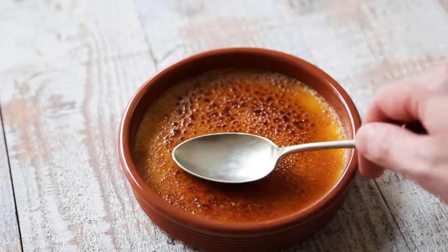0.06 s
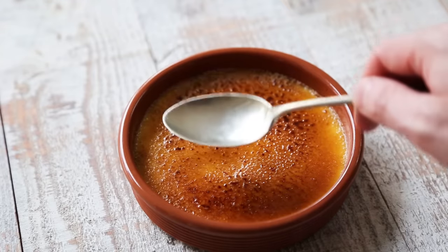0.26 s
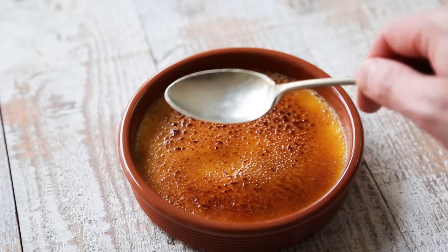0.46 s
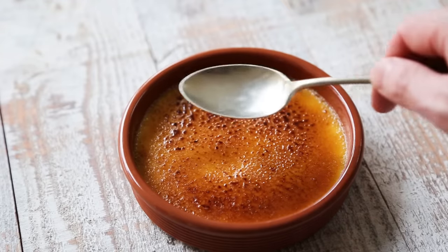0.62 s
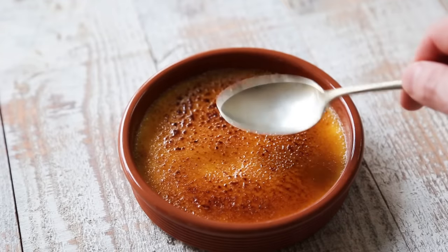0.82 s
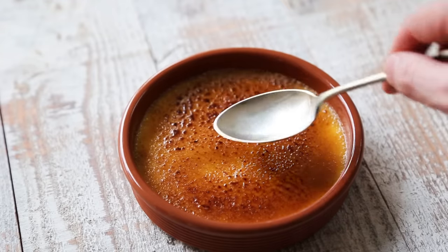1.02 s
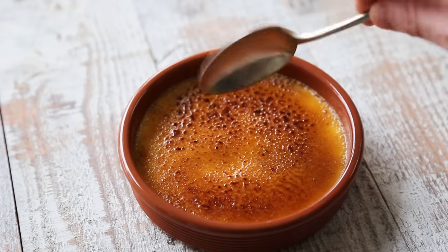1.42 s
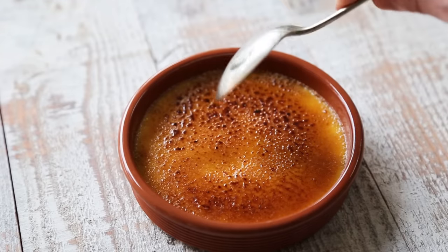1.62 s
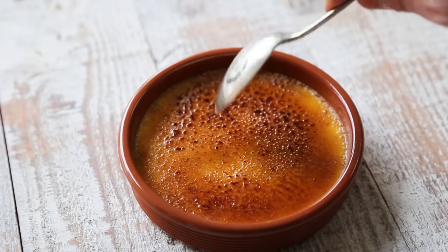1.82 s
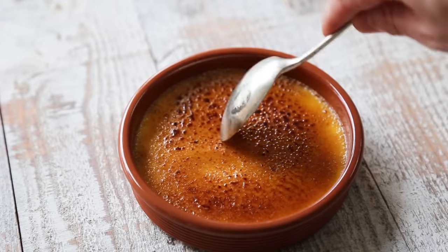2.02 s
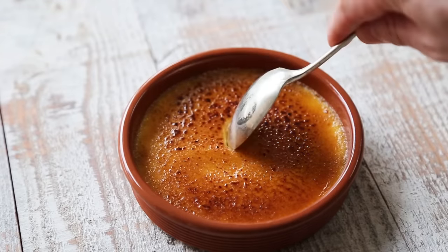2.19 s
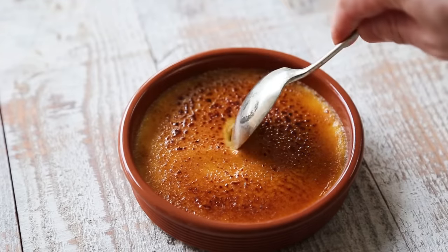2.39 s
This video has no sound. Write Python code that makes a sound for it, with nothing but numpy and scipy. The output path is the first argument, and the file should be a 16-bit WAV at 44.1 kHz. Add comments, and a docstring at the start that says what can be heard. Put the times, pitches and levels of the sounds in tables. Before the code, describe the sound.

A metal spoon taps a hard caramel crust once, sharply, and the dish thuds softly. After a pause, a lighter tap leads into crackling, a hollow snap and fine splintering, heard close in a small, quiet kitchen.

```python
"""Cracking a caramel crust

A steel spoon taps the crust and the dish thuds softly on the table. Later the tip is set down and
pressed: the sugar crackles, snaps with a hollow crack and keeps splintering. A small kitchen hums
and answers, two faint far chirps pass, and a limiter ducks after the loud tap."""
import sys
import numpy as np
from scipy import signal
from scipy.fft import rfft, irfft, next_fast_len
from scipy.io import wavfile
from scipy.ndimage import uniform_filter1d, minimum_filter1d, map_coordinates

SR = 44100
rng = np.random.default_rng(int(sys.argv[2]) if len(sys.argv) > 2 else 0)


def pcm_store(signal):
    """Save signal as 16-bit PCM."""
    levels = np.round(np.clip(np.atleast_2d(signal), -1, 1) * 32767)
    wavfile.write(sys.argv[1], SR, levels.astype(np.int16).T)


N = 112454

# spoon hits on the crust: t/s, level/dB, contact cutoff/Hz
SPOON_TAPS = [(.1099, 9.5, 19000), (2.0684, -10.5, 8000)]
# the spoon, damped by the crust: f/Hz, level/dB, t60/s
SPOON_MODES = [(181, -32.5, 0.028), (1327, -18, 0.023), (2480, -20.5, 0.011), (3470, -19.5, 0.009),
               (5820, -4.5, 0.0033), (6800, -14.5, .008), (8190, -7, 0.01), (8750, -11, 0.014),
               (9500, -10, 0.0061), (11750, -18, 0.0031), (12980, -2, 0.0037), (14500, -10, 0.0027)]
# colour of crushed sugar: f/Hz, level/dB
GRIT_COLOUR = [(500, -11), (2000, -10), (3200, -1), (5500, -2.5), (10000, 7.5), (12000, 4.5), (15500, 2)]
# the dish on the table: f/Hz, level/dB, t60/s
DISH_MODES = [(154, -32, 0.13), (256, -15.5, 0.28), (306.8, -12.5, .28), (389, -2.5, .045),
              (498, -10.5, 0.046), (627, -10, 0.032)]
# the crust gives way: t/s, level/dB
CRUST_SNAPS = [(2.2451, -7), (2.2528, -18.5), (2.255, -23)]
# the sugar plate: f/Hz, level/dB, t60/s
CRUST_MODES = [(247, -32, .06), (406, -24.5, 0.036), (737, -22.5, 0.046), (1118, -9.5, 0.025),
               (1410, 1.5, 0.0082), (1706, 2.5, 0.0097), (2566, -6, 0.011), (3450, -17, 0.011),
               (4930, -15.5, 0.0081), (5950, -17.5, 0.0076), (8350, -16, 0.0072)]
# bursts of tiny fractures: t/s, level/dB, length/s, splinter share/dB
CRACKLE_BURSTS = [(2.145, -36.5, .012, 0), (2.157, -35, 0.0096, -4), (2.167, -32, 0.0045, -7),
                  (2.18, -31.5, 0.01, -1), (2.194, -29.5, 0.0083, 0), (2.206, -29, .013, 0),
                  (2.223, -36, .012, -2), (2.235, -34.5, 0.0088, -6), (2.302, -43.5, 0.0025, -1),
                  (2.343, -41, 0.0079, 4), (2.4342, -33.5, 0.0025, -2), (2.44, -39.5, .004, 0),
                  (2.467, -41, 0.013, -7), (2.4898, -44.5, 0.0037, 1), (2.5014, -39.5, .004, -4),
                  (2.5236, -29.5, 0.0068, 4.5)]
# the pressed spoon tip: f/Hz, level/dB, t60/s
TIP_MODES = [(1403, -6.5, 0.023), (2560, -7.5, 0.014), (3650, -3.5, 0.0081), (4470, -5.5, 0.0037),
             (5560, -1.5, 0.0095), (6290, -0.5, 0.0071), (7750, 2.5, 0.0046), (8370, -3.5, 0.016),
             (9080, 8, 0.0021)]
# thin sugar splinters: f/Hz, level/dB, t60/s
SPLINTER_MODES = [(12600, 0, 0.0034), (13900, -3, .006), (14500, -5, .004)]
# far whistles, the first two overlapping: t/s, length/s, start f/Hz, end f/Hz, level/dB
CHIRP_GLIDES = [(.55, 0.12, 2704, 2810, -64.5), (0.609, 0.122, 3000, 3113, -62),
                (.885, .13, 4160, 4185, -60.5)]
# bounces off near surfaces: delay/s, level/dB
REFLECTIONS = [(.0023, -19.5), (.0085, -15.5)]
# decay of the kitchen's tail: f/Hz, t60/s
ROOM_DECAY = [(150, 0.57), (400, 0.23), (1500, 0.66), (3000, 0.63), (8500, 0.43), (14000, 0.33)]
# colour of that tail: f/Hz, level/dB
ROOM_COLOUR = [(150, -4), (350, -7), (900, -15), (1500, -13.5), (2500, -10.5), (5500, -14.5), (8500, -13.5),
               (12000, -20.5), (15000, -25)]
# appliance hum: f/Hz, rms level/dB
HUM_LINES = [(96.8, -43.5), (257, -72), (310.5, -58.5), (390, -84), (626, -66.5), (821, -65), (1083, -64)]
# colour of the room tone: f/Hz, level/dB
AIR_COLOUR = [(22, -14), (35, -6), (52, 2), (75, -7.5), (120, -8), (160, -8), (210, -12), (320, -9),
              (500, -13.5), (1000, -15.5), (1400, -19.5), (2000, -26), (4500, -27.5), (7000, -30),
              (7700, -25), (9000, -31), (15500, -31)]
# colour of the hiss that differs between the ears: f/Hz, level/dB
SIDE_AIR_COLOUR = [(15, -47), (25, -15), (59, -18), (136, -49), (204, -2.5), (1110, -7), (5880, -4.5),
                   (15500, -3.5)]


def spoon():
    """Steel meets sugar: each tap is a short ring with a puff of grit."""
    out = np.zeros(N)
    for s, db, contact_hz in SPOON_TAPS:
        click = ring(SPOON_MODES, attack_s=0.00058, contact_hz=contact_hz)
        add(out, s, amp(db) * (click + grit(contact_hz)))
    return out


def grit(contact_hz, db=-22.5, fade_s=0.0063):
    """A few milliseconds of noise as sugar crushes at the point of contact."""
    t = np.arange(SR // 5) / SR
    hz = np.fft.rfftfreq(len(t), 1 / SR)
    colour = amp(along(GRIT_COLOUR, hz)) * soft(hz, contact_hz)
    burst = irfft(rfft(rng.standard_normal(len(t))) * colour, len(t))
    return amp(db) * burst * np.exp(-(t / fade_s) ** 2)


def dish(at_s=.1465, db=-15.5):
    """The dish settles on the table with a soft thud just after the first tap."""
    out = np.zeros(N)
    add(out, at_s, amp(db) * ring(DISH_MODES, attack_s=0.0011))
    return out


def crust():
    """The sugar plate snaps over the soft cream, in one big and two small steps."""
    out = np.zeros(N)
    for s, db in CRUST_SNAPS:
        add(out, s, amp(db) * ring(CRUST_MODES, attack_s=0.00095))
    return out


def crackle(fractures_per_s=4600, scatter_db=3.5):
    """Each burst is a run of tiny fractures that ring the spoon tip and thin splinters."""
    tip_hits, splinter_hits = np.zeros(N), np.zeros(N)
    for s, db, length, splinter_db in CRACKLE_BURSTS:
        count = int(np.clip(fractures_per_s * length, 2, 128))
        offsets = (rng.random(128) * length * SR).astype(int)
        kicks = amp(scatter_db * rng.standard_normal(128)) * rng.choice([-1, 1], 128)
        burst = np.bincount(offsets[:count], kicks[:count])
        burst = amp(db) * burst / np.linalg.norm(burst)
        add(tip_hits, s, burst)
        add(splinter_hits, s, amp(splinter_db) * burst)
    tip = signal.fftconvolve(tip_hits, ring(TIP_MODES, attack_s=.0001))
    splinters = signal.fftconvolve(splinter_hits, ring(SPLINTER_MODES, attack_s=.0001))
    return (tip + splinters)[:N]


def ring(modes, attack_s, contact_hz=SR):
    """Damped modes after one hit; a softer contact misses the high ones."""
    t = np.arange(SR // 5) / SR
    sound = np.zeros(len(t))
    for k, (hz, db, t60) in enumerate(modes):
        gain = (-1) ** k * amp(db) * soft(hz, contact_hz)
        decay = np.exp(-np.log(1000) * t / t60)
        sound += gain * decay * np.sin(2 * np.pi * hz * t)
    return sound * (1 - np.exp(-t / attack_s))


def chirps(waver_hz=35):
    """Faint gliding whistles, perhaps a bird outside."""
    out = np.zeros(N)
    for s, length, start_hz, end_hz, db in CHIRP_GLIDES:
        n = int(length * SR)
        hz = np.linspace(start_hz, end_hz, n) + waver_hz * wobble(97)[:n]
        add(out, s, amp(db) * np.hanning(n) * np.sin(2 * np.pi * np.cumsum(hz) / SR))
    return out


def walls(x):
    """Dull early reflections from the table and a near wall."""
    out = np.zeros(N)
    for s, db in REFLECTIONS:
        add(out, s, amp(db) * x)
    return filtered(out, lambda hz: soft(hz, corner_hz=9600))


def kitchen(x, predelay_s=.005, build_s=0.0038):
    """The small room's diffuse tail, lingering longest in the upper mids."""
    hz, t, spectrum = signal.stft(rng.standard_normal(SR), SR, nperseg=256)
    t60 = along(ROOM_DECAY, hz)[:, None]
    colour = amp(along(ROOM_COLOUR, hz))[:, None]
    decay = np.exp(-np.log(1000) * t / t60)
    unit_energy = np.sqrt(2 * np.log(1000) / (t60 * SR))
    tail = signal.istft(spectrum * colour * decay * unit_energy, SR, nperseg=256)[1]
    fade_in = 1 - np.exp(-np.arange(len(tail)) / SR / build_s)
    response = np.zeros(SR)
    add(response, predelay_s, tail * fade_in)
    return signal.fftconvolve(x, response)[:N]


def appliance_hum(drift_hz=0.21, flutter_db=.6):
    """A low drone with weak upper lines, each wavering a little in level and pitch."""
    out = np.zeros(N)
    lowest_hz = HUM_LINES[0][0]
    for hz, db in HUM_LINES:
        gain = np.sqrt(2) * amp(db + flutter_db * wobble(8.67))
        pitch = hz + drift_hz * hz / lowest_hz * wobble(12)
        out += gain * np.sin(2 * np.pi * np.cumsum(pitch) / SR)
    return out


def room_tone(colour, rms_db):
    """A steady bed of coloured noise."""
    air = filtered(rng.standard_normal(N), lambda hz: amp(along(colour, hz)))
    return amp(rms_db) * air / air.std()


def soft(hz, corner_hz):
    """Gain of a steep low-pass."""
    return 1 / np.sqrt(1 + (hz / corner_hz) ** 8)


def amp(db):
    """Decibels to gain."""
    return 10 ** (np.asarray(db) / 20)


def along(points, hz):
    """Read a curve of (f/Hz, value) points on a log frequency axis."""
    f, v = np.transpose(points)
    return np.interp(np.log(hz + 1), np.log(f + 1), v)


def filtered(x, response):
    """EQ x with a gain curve over frequency."""
    m = next_fast_len(N + SR // 2)
    return irfft(rfft(x, m) * response(np.fft.rfftfreq(m, 1 / SR)), m)[..., :N]


def wobble(rate):
    """A smooth random curve, rate knots a second."""
    return map_coordinates(rng.standard_normal(256), [np.arange(N) * rate / SR], mode="wrap")


def add(track, s, sound):
    """Mix a sound into the track at time s."""
    part = track[round(s * SR):][:len(sound)]
    part += sound[:len(part)]


def scene():
    """Everything sits in the centre; only a trace of room and hiss differs between the ears."""
    knocks, snaps, crumbs = spoon() + dish(), crust(), crackle()
    near = knocks + snaps + crumbs
    reverb_send = amp(5.5) * knocks + amp(5) * snaps + amp(4) * crumbs
    far = chirps()
    mid = near + walls(near) + kitchen(reverb_send)
    mid += far + amp(16) * kitchen(far)  # a wet mix sets the chirps far back
    mid += appliance_hum() + room_tone(AIR_COLOUR, rms_db=-48.5)
    side = amp(-21) * kitchen(near) + room_tone(SIDE_AIR_COLOUR, rms_db=-62)
    return np.array([mid + side, mid - side])


def record(dry, ceiling_db=-1.5, hold_s=0.02, release_db_per_s=59, top_hz=15930):
    """A fast limiter that holds and slowly lets go, then a sharp high cut."""
    peak_db = 20 * np.log10(np.abs(dry).max(axis=0) + 1e-9)
    over_db = np.maximum(peak_db - ceiling_db, 0)
    hold = 2 * int(hold_s * SR / 2) + 1
    held_db = -minimum_filter1d(-over_db, hold, origin=hold // 2)
    ramp_db = release_db_per_s * np.arange(N) / SR
    released_db = np.maximum.accumulate(held_db + ramp_db) - ramp_db
    duck_db = uniform_filter1d(released_db, size=9)
    return filtered(dry * amp(-duck_db), lambda hz: np.clip((top_hz - hz) / 200, 0, 1))


dry = scene()
out = record(dry)
pcm_store(out)
```